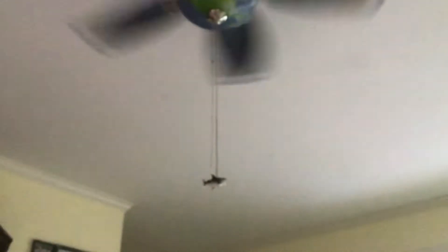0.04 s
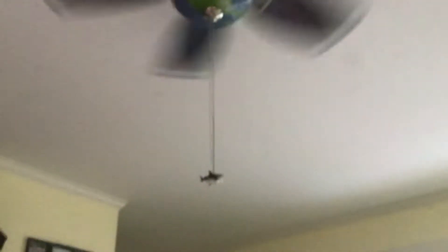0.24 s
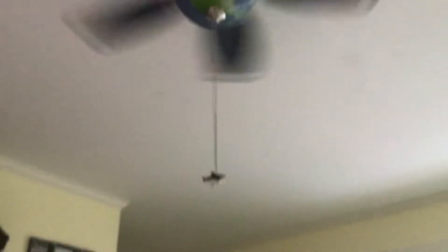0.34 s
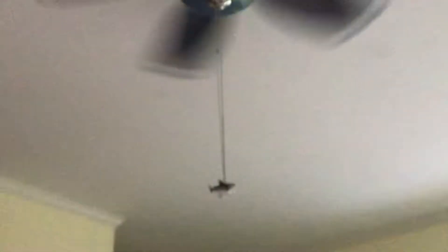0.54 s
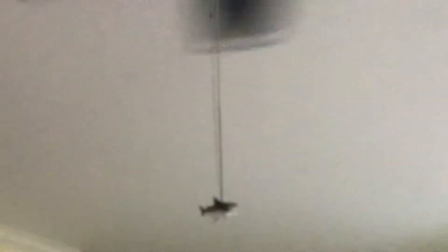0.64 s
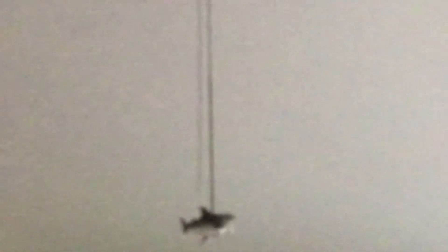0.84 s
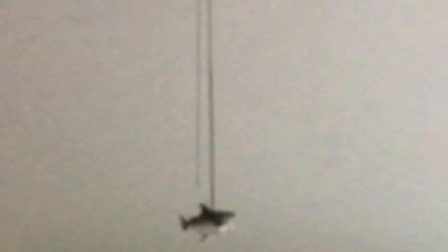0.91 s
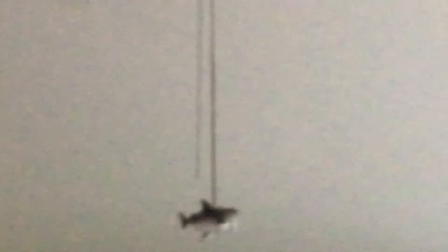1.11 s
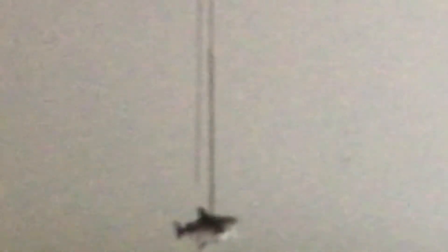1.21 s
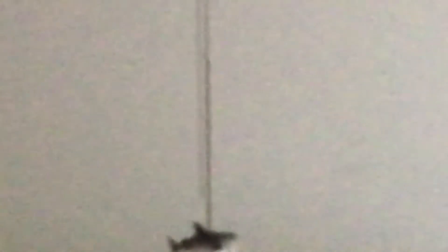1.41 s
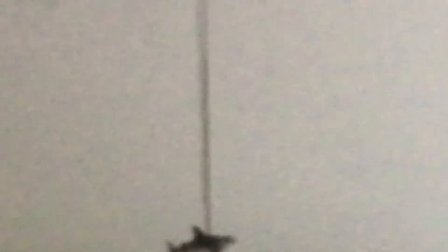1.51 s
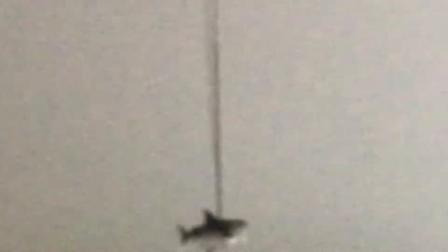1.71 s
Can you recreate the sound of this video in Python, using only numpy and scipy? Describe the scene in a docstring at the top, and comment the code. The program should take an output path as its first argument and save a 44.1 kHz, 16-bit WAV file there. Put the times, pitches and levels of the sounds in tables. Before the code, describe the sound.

Irregular close handling knocks and clicks on a phone, one sharp snap, over faint room air

```python
"""First the still air of a quiet room under a slow ceiling fan, with microphone hiss: shaped steady noise.
Faint electrical ticks from the screen and the sensor repeat in it: two trains of tiny ringing bursts.
The hand-held phone rumbles in the grip (random small pushes) and fingers slip on its glass (noise grains).
Closest of all, fingertips tap the glass: knocks, thuds and sharp snaps, each a band-shaped push.
Contact sounds reach the microphone through the body, highs first and lows later, so knocks fall in pitch."""
import sys
import numpy as np
from scipy import signal
from scipy.fft import rfft, irfft
from scipy.io import wavfile

SR = 44100
rng = np.random.default_rng(int(sys.argv[2]) if len(sys.argv) > 2 else 0)


def pcm_store(signal):
    """Save signal as 16-bit PCM."""
    levels = np.round(np.clip(np.atleast_2d(signal), -1, 1) * 32767)
    wavfile.write(sys.argv[1], SR, levels.astype(np.int16).T)


def how_loud(loudness_db):
    """Turn decibels into a plain amplitude multiplier (0 dB gives 1, 20 dB gives 10)."""
    steps = np.asarray(loudness_db, float) / 20
    return 10 ** steps


N = 77175  # samples, 1.75 s

# frequency grid for sounds carried through the case, 1 Hz up to keep logarithms finite
SIZE = 8192
HZ = np.fft.rfftfreq(SIZE, 1 / SR) + 1
LEAD = 512  # samples of lead-in ahead of each contact


def evened(x):
    """Scales a sound to rms 1."""
    return x / np.sqrt(np.mean(x ** 2) + 1e-20)


def read(points, hz):
    """Reads a spectrum in dB between its points on a log frequency axis."""
    f, value = np.transpose(points)
    return np.interp(np.log(hz + 1), np.log(f + 1), value)


def add(mix, s, sound):
    """Mixes in a sound at s seconds; its lead-in of LEAD samples lies before s."""
    part = mix[round(s * SR) - LEAD:][:len(sound)]
    part += sound[:len(part)]


# spectrum of the room air and microphone hiss together: f/Hz, relative level/dB per Hz
AIR_SPECTRUM = [(32, -42.5), (55, -5.5), (214, -1), (247, 0.5), (278, -17), (388, -5), (437, -9),
                (851, -25), (1310, -27), (1440, -26.5), (1740, -32), (2210, -32), (3640, -37.5),
                (5200, -35), (6000, -40.5), (7800, -38.5), (11400, -44), (13800, -38), (16300, -50)]


def air():
    """Room air from the fan and microphone hiss: white noise filtered to one steady spectrum."""
    level_db = -55  # rms
    f = np.fft.rfftfreq(N, 1 / SR)
    noise = irfft(rfft(rng.standard_normal(N)) * how_loud(read(AIR_SPECTRUM, f)), N)
    return how_loud(level_db) * evened(noise)


# the two trains of electrical ticks: first t/s, last t/s, repeats per s
TICK_TRAINS = [(.0113, 1.45, 60.0), (.0158, 1.75, 29.97)]
# drive of each train, before the ring and the mix of its two parts: relative level/dB
TICK_LEVELS = (-50.5, -51)
# broad peaks of one tick: f/Hz, width of the noisy part/Hz, relative level/dB
TICK_PEAKS = [(3100, 500, -8), (5000, 800, -1), (7800, 800, -1), (10000, 900, -4), (14100, 900, -2)]


def ticks():
    """Two steady trains of one tiny burst: part identical tones, part noise that is new each time."""
    burst_s, spread_db, loose_share = .0007, 1.5, .2
    gate, t = np.zeros(N), np.arange(300) / SR
    for (first, last, rate), db in zip(TICK_TRAINS, TICK_LEVELS):
        at = np.round(np.arange(first, last, 1 / rate) * SR).astype(int)
        at = at[at < N]
        gate[at] = how_loud(db + spread_db * rng.standard_normal(len(at)))
    shape = np.e * t / burst_s * np.exp(-t / burst_s) ** 2
    tones = sum(how_loud(db) * np.sin(2 * np.pi * hz * t) for hz, width, db in TICK_PEAKS)
    same = np.convolve(gate, shape * tones)[:N]

    f = np.fft.rfftfreq(N, 1 / SR)
    peaks = sum(how_loud(db) * np.exp(-.5 * ((f - hz) / width) ** 2) for hz, width, db in TICK_PEAKS)
    noise_bursts = np.convolve(gate, shape)[:N] * rng.standard_normal(N)
    loose = irfft(rfft(noise_bursts) * peaks, N)
    return .5 * (1 - loose_share) * same + loose_share * loose


# resonances of the case, added to its plain response of 0 dB: f/Hz, width/Hz, level/dB
CASE_MODES = [(110.4, 20, -2.8), (291.6, 150, 0.6), (400, 29, -6.5), (590, 38, 1), (910, 138, 0),
              (1416, 310, -7.5), (2130, 340, -6.5), (2864, 100, -4.5), (3440, 200, -27.5), (3982, 250, 1.5),
              (5180, 750, -9), (6100, 300, -7), (8800, 320, 2)]


def case_response():
    """The plain path through the case plus its damped resonances, as a complex spectrum."""
    modes = (how_loud(db) * 1j * width * HZ / (hz ** 2 - HZ ** 2 + 1j * width * HZ)
             for hz, width, db in CASE_MODES)
    return 1 + sum(modes)


CASE_RING = case_response()


def travel(x, gain):
    """Colours x and carries it through the ringing case, where low frequencies lag."""
    lag_cycles = 2.3  # each frequency arrives this many of its own cycles late
    turns = lag_cycles * np.log(HZ / HZ[-1]) + HZ * LEAD / SR
    return irfft(rfft(x, SIZE) * gain * np.exp(-2j * np.pi * turns) * CASE_RING)


def push(peak_db, hz, octaves):
    """One push on the case: an impulse limited to a bell-shaped band around hz."""
    band = np.exp(-.5 * (np.log2(HZ / hz) / octaves) ** 2)
    out = travel(np.ones(1), band)
    return how_loud(peak_db) * out / abs(out).max()


# rumble of the grip while the fingers move: t/s, level/dB
GRIP_LEVEL = [(0, -58), (.3, -60), (.45, -51.5), (.75, -53), (.95, -54.5), (1.1, -58.5), (1.3, -52.5),
              (1.75, -62)]


def grip():
    """Many small random pushes of the holding hand, of either sign and uneven size."""
    pushes_per_s, spread_db = 300, 2.5
    sign_and_size = how_loud(spread_db * np.minimum(rng.exponential(1, N), 4)) * rng.choice([-1., 1.], N)
    pushes = sign_and_size * (rng.random(N) < pushes_per_s / SR)
    rumble = signal.fftconvolve(pushes, push(0, 176, 0.99))[LEAD:N + LEAD]
    level_db = np.interp(np.arange(N) / SR, *np.transpose(GRIP_LEVEL))
    return how_loud(level_db) * evened(rumble)


# skin slips on the glass, plus the brief hiss of the loudest snap (the short row at 0.785 s): # start t/s,
# length/s, rms level/dB, tilt above the peak/dB per octave, share of the length spent rising, squeak f/Hz
SKIN_SLIPS = [(0.363, 0.027, -51.5, 1, 0.19, 4480), (0.415, 0.042, -60.5, -9, 0.24, 2580),
              (0.458, .017, -44.5, 0, 0.23, 6100), (0.489, 0.025, -52, -2.5, .6, 5900),
              (0.52, 0.03, -55, -7, 0.14, 2800), (0.554, 0.016, -48.5, -2.5, 0.59, 6160),
              (0.6038, 0.022, -40.5, -1.5, 0.11, 5650), (0.642, 0.025, -60, 6.5, 0.12, 1800),
              (0.6703, .024, -43.5, -0.5, .08, 5730), (0.7153, .023, -47, 2, .15, 2390),
              (0.764, 0.003, -62, -0.5, .4, 2110), (0.772, 0.023, -41, -0.5, 0.43, 4000),
              (0.7852, 0.0044, -35.5, 3, 0.64, 5060), (0.838, 0.016, -41, -5, 0.28, 1800),
              (0.863, 0.016, -44.5, -2, 0.32, 2170), (0.891, 0.022, -48.5, -4, 0.44, 2030),
              (0.975, 0.032, -46, -2, 0.24, 2300), (1.003, 0.014, -32.5, 0, 0.26, 5080),
              (1.163, 0.023, -48, 0, 0.36, 4770), (1.193, 0.017, -51, 1, 0.15, 2400),
              (1.217, 0.018, -64.5, 2, 0.4, 4000), (1.27, 0.036, -64, 1.5, 0.095, 2530),
              (1.294, 0.032, -61, -11, 0.13, 1500), (1.392, 0.028, -58, 1.5, .3, 1540),
              (1.433, 0.018, -62, 3, 0.26, 2300), (1.640, .014, -57, 3, 0.23, 2420)]
# colour common to the slips, ahead of the case: f/Hz, relative level/dB per Hz
SKIN_COLOUR = [(290, -18.5), (500, -3.5), (773, -4), (1180, -9.5), (2360, -8.5), (2770, -13), (3700, -22.5),
               (6610, -26), (7310, -26), (8960, -33.5), (9770, -33), (12100, -28.5), (15300, -38.5),
               (16000, -51)]


def slips():
    """Skin sticks and slips on the glass, and the loudest snap hisses briefly in the treble: short bursts of
    uneven noise grains with a squeak band."""
    peak_hz, fade_db, grain_db = 2800, -16.5, 2.5  # the fade is reached at the end of the length
    squeak_boost_db, squeak_octaves = 6, 0.11
    out = np.zeros(N)
    noises = rng.standard_normal((len(SKIN_SLIPS), 2048))
    sizes = rng.exponential(1, (len(SKIN_SLIPS), 128))
    for (s, length, db, tilt_db, rise, squeak_hz), noise, size in zip(SKIN_SLIPS, noises, sizes):
        u = np.arange(2048) / SR / length
        shape = np.minimum(u / rise, 1) ** 2 * how_loud(fade_db * u ** 3)
        grain_size = np.minimum(np.repeat(size, 16), 4)  # one size for each 16 samples
        grains = shape * noise * how_loud(grain_db * grain_size)
        squeak_db = squeak_boost_db * np.exp(-.5 * (np.log2(HZ / squeak_hz) / squeak_octaves) ** 2)
        slope_db = tilt_db * np.log2(np.maximum(HZ / peak_hz, 1))
        sound = travel(grains, how_loud(read(SKIN_COLOUR, HZ) + squeak_db + slope_db))
        rms = np.sqrt((sound ** 2).sum() / (length * SR))
        add(out, s, how_loud(db) * sound / rms)
    return out


# sharp snaps of the case: t/s, peak level/dB, f/Hz, width/octaves
CASE_SNAPS = [(0.352, -47.5, 2050, 0.45), (0.3738, -34, 1400, 0.27), (.3761, -44, 4430, 0.15),
              (.4381, -54, 1510, 0.64), (0.4637, -26.5, 2170, 0.27), (.4649, -47.5, 4200, 0.094),
              (0.4701, -38.5, 2440, 0.25), (0.5057, -36.5, 1900, 0.46), (0.5631, -42, 2010, 0.47),
              (0.6089, -27.5, 2700, 0.34), (.6751, -27, 2210, 0.36), (.7226, -33, 2470, 0.49),
              (0.7863, -18.5, 3320, 0.39), (0.7868, -11, 2080, 0.2), (.7871, -18.5, 1467, 0.25),
              (0.7868, -32, 8800, 0.15), (0.7881, -17.5, 2800, 0.23), (0.8716, -47, 3510, .75),
              (1.0074, -30, 1700, 0.65), (1.0106, -21.5, 1630, 0.31), (1.0122, -28.5, 920, 0.26),
              (1.2973, -46.5, 1500, 0.24), (1.299, -46, 790, 0.13), (1.1736, -33, 1400, 0.37),
              (1.1741, -38, 960, 0.15), (1.1918, -44, 2310, 0.36), (1.1981, -58, 2460, 0.087),
              (1.6491, -52.5, 2510, 0.21), (1.6826, -52.5, 1810, 0.31)]


def snaps():
    """The case snaps: brief pushes, most of them above the pitch of the knocks."""
    out = np.zeros(N)
    for s, db, hz, octaves in CASE_SNAPS:
        add(out, s, push(db, hz, octaves))
    return out


# fingertip taps on the glass: t/s, knock peak level/dB, knock f/Hz, knock width/octaves,
# thud peak level/dB, thud f/Hz
FINGER_TAPS = [(0.1936, -31.5, 330, 0.51, -38.5, 158), (.352, -46, 686, 0.78, -38.5, 194),
               (.374, -35.5, 283, 0.27, -38, 114), (.409, -50, 796, 0.58, -46, 145),
               (.464, -32, 805, 0.89, -40.5, 126), (.507, -48, 675, 0.79, -42, 125),
               (.563, -39.5, 585, .6, -37, 147), (.607, -25, 904, 0.46, -33.5, 122),
               (.673, -24.5, 605, 0.37, -32.5, 107), (0.6743, -27.5, 294, 0.43, -46, 149),
               (0.7199, -35.5, 352, 0.33, -32, 151), (.717, -29.5, 593, 0.38, -34.5, 115),
               (0.7788, -27, 570, 0.32, -35.5, 114), (.786, -31, 274, 0.295, -44, 150),
               (.844, -30, 590, 0.35, -41.5, 125), (.871, -34, 428, 0.35, -43, 126),
               (.904, -33.5, 600, 0.27, -39, 186), (0.876, -54, 300, 0.45, -46.5, 70.3),
               (1.004, -39.5, 614, 0.96, -28.5, 197), (1.008, -23.5, 400, 0.17, -36, 125),
               (1.172, -32.5, 305.6, 0.41, -46.5, 148), (1.195, -36.5, 280, 0.53, -37, 88),
               (1.297, -37, 400, .4, -44.5, 120), (1.401, -47, 412, 0.27, -62, 118),
               (1.437, -39.5, 327, 0.71, -35.5, 106), (1.650, -35, 430, 0.51, -41.5, 105),
               (.915, -38, 302, 0.61, -67, 120), (1.718, -47, 294, .5, -61, 121),
               (.985, -44, 594, 0.25, -48.5, 72.5), (1.683, -40, 706, 0.21, -55, 121)]


def taps():
    """Each fingertip tap pushes the case in two bands at once, a knock and a thud."""
    thud_octaves = .48
    out = np.zeros(N)
    for s, knock_db, knock_hz, knock_octaves, thud_db, thud_hz in FINGER_TAPS:
        knock = push(knock_db, knock_hz, knock_octaves)
        thud = push(thud_db, thud_hz, thud_octaves)
        add(out, s, knock + thud)
    return out


def scene():
    """Room, ticks, hand and fingers together, one channel."""
    return (air() + ticks() + grip() + slips() + snaps() + taps())[None]


def band_limit(x):
    """A steep low-pass at the top of the band."""
    return signal.sosfilt(signal.butter(12, 16480, fs=SR, output="sos"), x)


def record(dry):
    """Low cut of the microphone at 31 Hz, then a steep band limit at 15.9 kHz."""
    low_cut = signal.butter(4, 31, "high", fs=SR, output="sos")
    cut = signal.sosfilt(low_cut, dry)
    edge = signal.firwin(511, 15900, window=("kaiser", 9), fs=SR)
    mix = signal.oaconvolve(cut, edge[None], "same")
    return band_limit(mix)


dry = scene()
out = record(dry)
pcm_store(out)
```